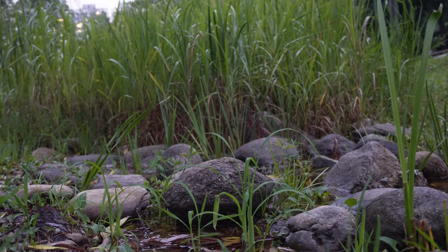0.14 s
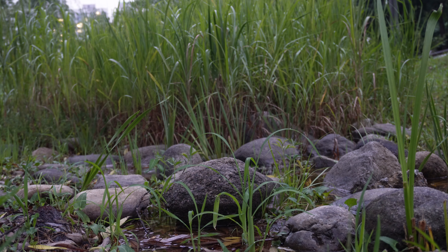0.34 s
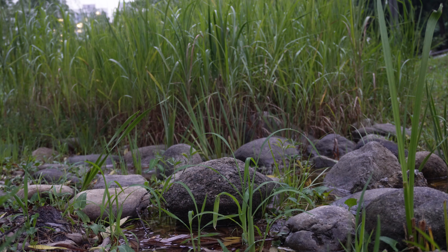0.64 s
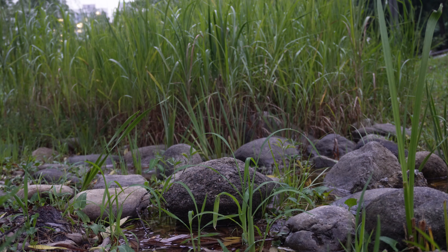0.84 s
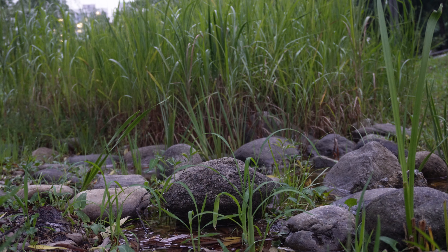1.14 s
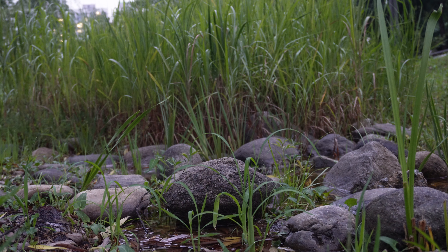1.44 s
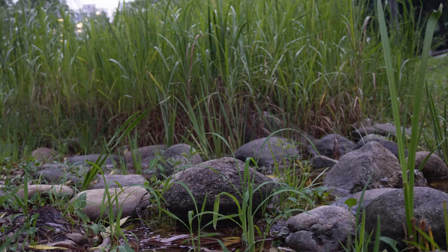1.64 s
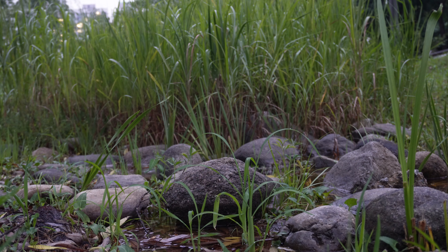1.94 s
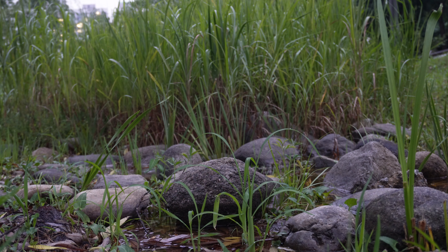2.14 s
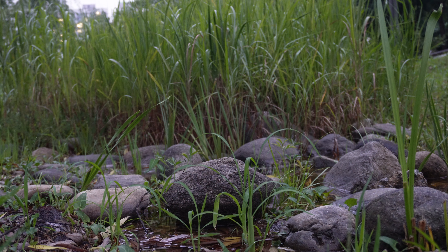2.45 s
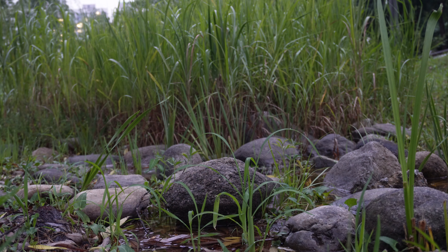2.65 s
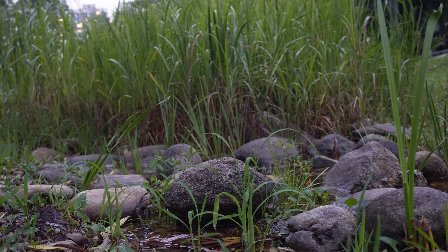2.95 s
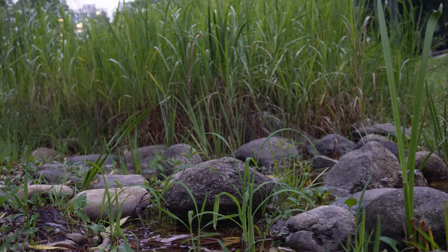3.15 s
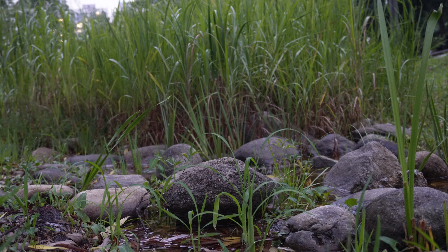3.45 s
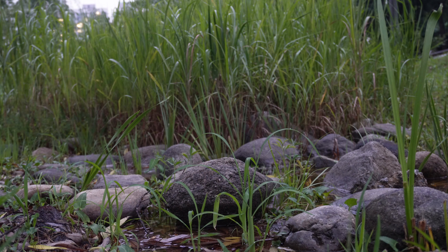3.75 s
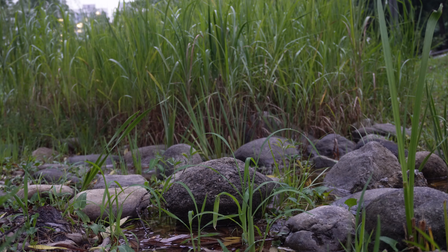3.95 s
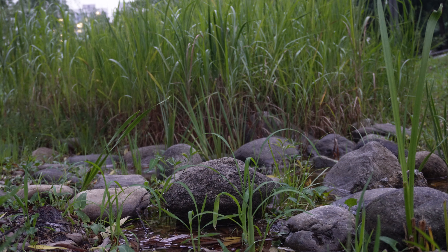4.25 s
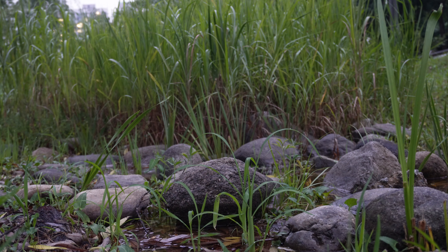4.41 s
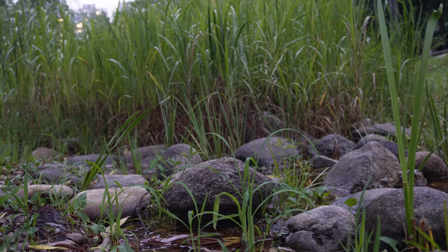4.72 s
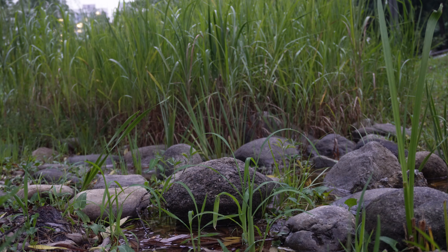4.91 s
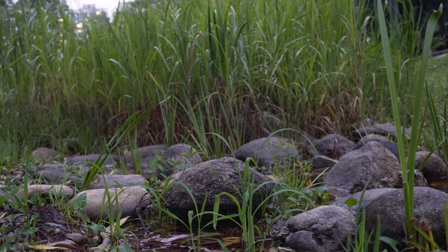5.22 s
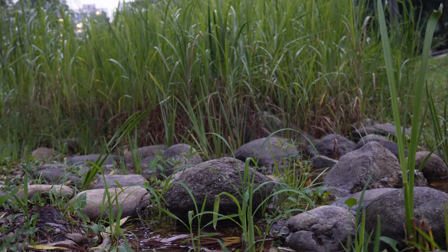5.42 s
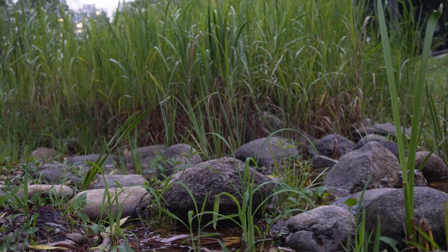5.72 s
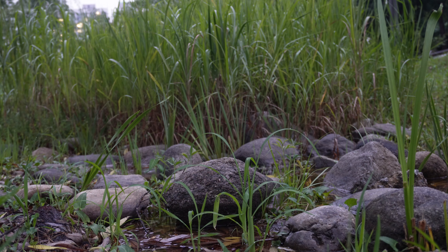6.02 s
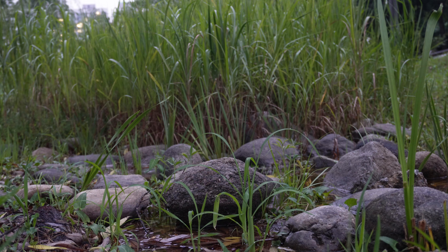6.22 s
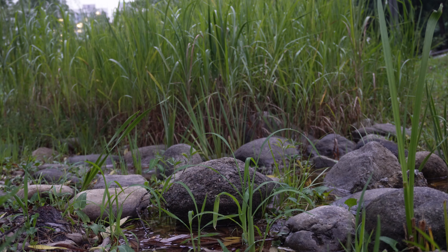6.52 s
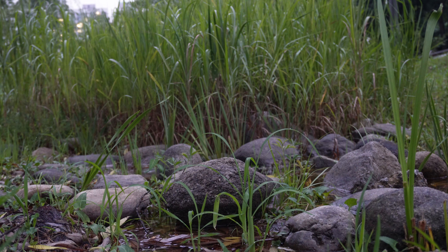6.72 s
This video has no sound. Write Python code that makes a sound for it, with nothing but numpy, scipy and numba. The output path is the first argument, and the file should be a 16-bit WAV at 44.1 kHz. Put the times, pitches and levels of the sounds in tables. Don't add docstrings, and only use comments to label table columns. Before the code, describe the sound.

A dense, bright cicada chorus shimmers without pause in a park with reeds and stones. One close cicada, near centre, repeats a phrase about once a second: a throbbing drone grows, drops into a loud steady ring, cuts off abruptly, then a thin very high zip follows. Two steady neighbours rattle, one at left. Low town rumble and a soft stream hush lie beneath. Stereo microphone outdoors, close to the singer.

```python
import sys
import numpy as np
from scipy import signal
from scipy.fft import rfft, irfft, next_fast_len
from scipy.io import wavfile
from scipy.ndimage import uniform_filter1d
from numba import njit

SR = 44100
rng = np.random.default_rng(int(sys.argv[2]) if len(sys.argv) > 2 else 0)


def rack_gain(trim_db):
    fader = np.asarray(trim_db, float)
    return 10 ** (fader / 20)


def file_out(sig):
    cols = np.atleast_2d(sig).T
    lim = np.clip(cols, -1, 1)
    pcm = np.round(lim * 32767).astype(np.int16)
    wavfile.write(sys.argv[1], SR, pcm)


N = 302967
T = np.arange(N) / SR
SIZE = next_fast_len(N + SR // 2)
HZ = np.maximum(np.arange(SIZE // 2 + 1) * SR / SIZE, 1)

# pitch_hz, level_db (per Hz)
TOWN_COLOUR = [(13, -40), (26, -11), (43, 0.5), (86, -3.5), (187, -1.5), (260, -5), (423, -11),
               (601, -12.5), (702, -15), (1190, -20), (1700, -22.5), (2300, -21.5), (3000, -35.5)]
# pitch_hz, side_minus_mid_db
TOWN_WIDTH = [(30, -48), (125, -36), (300, -22), (600, -17.5), (2000, -13)]
# nearest_s, swell_db, passing_s
VEHICLE_PASSES = [
    (-.1, 4.5, 0.69),
    (1.5, 3, 1.0),
    (2.75, 2, 0.22),
    (4.25, 2, 0.1),
    (6.95, 3.5, 0.28),
]
# centre_s, swell_db, length_s
ENGINE_REVS = [
    (0, 13, 0.55),
    (2.05, 12, 0.48),
    (6.9, 9, 0.67),
]
# pitch_hz, level_db (per Hz)
CROWD_COLOUR = [(1800, -53), (2350, -64), (2600, -23), (3150, -18.5), (3600, -8.5), (3940, -9),
                (4380, -3.5), (5250, -5), (5790, -4.5), (6770, -8), (9950, -18.5), (13400, -31.5),
                (15000, -45), (15800, -57)]
# pitch_hz, width_hz, level_db
CROWD_BUNCHES = [(4420, 730, 0), (5300, 99, -4.5), (5770, 280, 3.5)]
# pitch_hz, share (0-1)
CROWD_SHARED = [(2500, 0.84), (4000, 0.61), (6000, 0.31), (9000, 0.58), (12000, 0.4), (15000, 0.5)]
# pitch_hz, lead_radians
CROWD_LEAD = [(2500, 0.8), (4000, 0), (6000, 0.92), (9000, 1.57), (12000, 1), (15000, 7.5)]
# clicks_per_s, click_levels_db (one group), resonances (pitch_hz, width_hz, level_db),
# level_db, left_minus_right_db, right_lag_samples
STEADY_SINGERS = [
    (199.9, (-3.5, 4, -31, -30, -14, -1), [(3800, 990, -5.5), (4950, 100, -3.5), (5220, 500, -5), (6020, 470, -1.5), (6420, 45, -6.5)], -31, 6.3, 1.3),
    (226.5, (10, -14, 12, 1, -8, -16), [(4320, 540, -4), (6350, 390, -5), (9770, 4000, -8)], -29.5, 1, 1.53),
]
# ring_stop_s, ring_db, zip_db
SONG_PHRASES = [
    (-.52, 0, 0),
    (0.477, -3, 6),
    (1.501, -2.5, 5),
    (2.488, -2, 5),
    (3.532, -2.5, 5),
    (4.509, -2.5, 4),
    (5.493, -2, 4),
    (6.476, -1, 3),
    (7.47, -2, 0),
]
# left_minus_right_db, right_lag_samples, echo_db, echo_decay_s
ZIP_POSITION = (-1, 1.0, -3, .12)


def level(x, db):
    return x * rack_gain(db) / np.sqrt(np.mean(x ** 2))


def over_hz(table):
    hz, value = np.transpose(table)
    return np.interp(np.log(HZ), np.log(hz), value)


def ramp(t, start, length):
    return np.clip((t - start) / length, 0, 1)


def swells(rows):
    return sum(db * np.exp(-((T - s) / length) ** 2) for s, db, length in rows)


def walk(rate):
    k = int(SR / rate)
    held = np.repeat(rng.standard_normal(N // k + 1), k)
    return 1.3 * uniform_filter1d(uniform_filter1d(held, k), k)[:N]


@njit
def svf(x, hz, width):
    y, band, low = np.empty(len(x)), 0., 0.
    for i in range(len(x)):
        g, k = np.tan(np.pi * hz[i] / SR), width / hz[i]
        v = (band + g * (x[i] - low)) / (1 + g * (g + k))
        band, low, y[i] = 2 * v - band, low + 2 * g * v, k * v
    return y


def ring(x, hz, width):
    hz = hz + np.zeros(N)
    once = svf(x, hz, float(width))
    return level(svf(once, hz, float(width)), 0)


def tymbal(hz, group_db, drift, rough, scatter_db, wobble_hz=4):
    rate = hz * (1 + drift * walk(wobble_hz))
    turns = rng.random() * len(group_db) + np.cumsum(rate) / SR
    count = np.arange(int(turns[0]) + 1, int(turns[-1]))
    size = rack_gain(np.array(group_db)[count % len(group_db)] + scatter_db * rng.standard_normal(len(count)))
    moment = np.interp(count, turns, np.arange(N - 0.))
    first, clicks = moment.astype(int), np.zeros(N + 1)
    clicks[first] = size * (first + 1 - moment)
    clicks[first + 1] = size * (moment - first)
    clicks = clicks[:N]
    decay = np.exp(-1 / (0.0015 * SR))
    scrape = signal.lfilter([1], [1, -decay], clicks) * rng.standard_normal(N)
    rough = np.clip(rough, 0, 1)
    return np.sqrt(1 - rough) * level(clicks, 0) + np.sqrt(rough) * level(scrape, 0)


def place(x, pan_db, lag, wet_db, t60):
    age = np.arange(SR // 3) / SR
    echoes = rng.standard_normal((2, len(age))) * rack_gain(-60 * age / t60) * (age > .004)
    echoes *= rack_gain(wet_db) / np.sqrt(np.sum(echoes ** 2, axis=1, keepdims=True))
    delay = np.exp(-1j * np.pi * HZ / SR * lag * np.array([[-1], [1]]))
    direct = delay * rack_gain(np.array([[pan_db], [-pan_db]]) / 2)
    return irfft(rfft(x, SIZE) * (direct + rfft(echoes, SIZE)), SIZE)[:, :N]


def town():
    mid, side = rfft(rng.standard_normal((2, SIZE))) * rack_gain(over_hz(TOWN_COLOUR))
    both = mid + side * rack_gain(over_hz(TOWN_WIDTH)) * np.array([[1], [-1]])
    water = HZ ** 2 / (HZ ** 2 + 514.0 ** 2)
    rumble = irfft(both * (1 - water), SIZE)[:, :N]
    stream = irfft(both * water, SIZE)[:, :N]
    rumble_db = -41 + swells(VEHICLE_PASSES)
    return level(rumble, 0) * rack_gain(rumble_db) + level(stream, -48.5) * rack_gain(.6 * walk(4.0))


def motor():
    fast_hz, idle_hz = 221.3, 180.7
    hz = fast_hz + (idle_hz - fast_hz) * ramp(T, start=0.73, length=1.82)
    return rack_gain(-52.5 + swells(ENGINE_REVS)) * ring(rng.standard_normal(N), hz, 12.3)


def crowd(count=18):
    out, alike = 0, np.clip(over_hz(CROWD_SHARED), 0, 1)
    lead = over_hz(CROWD_LEAD)
    age = np.arange(SR // 4) / SR
    for _ in range(count):
        rate, side = rng.random(2)
        group_db = 5.1 * rng.standard_normal(6)
        clicks = tymbal(180 + 60 * rate, group_db, drift=.01, rough=0.56, scatter_db=0.86)
        tails = rfft(rng.standard_normal((3, len(age))) * rack_gain(-60 * age / 0.16), SIZE)
        turn = lead + 2 * np.pi * HZ / SR * 0.82 * (side - .5)
        lag = np.exp(-.5j * turn * np.array([[-1], [1]]))
        paths = np.sqrt(alike) * tails[0] * lag + np.sqrt(1 - alike) * tails[1:]
        out = out + rfft(clicks * rack_gain(0.37 * walk(1.44)), SIZE) * paths
    bunches_db = sum(g * np.exp(-((HZ - f) / w) ** 2 * 2) for f, w, g in CROWD_BUNCHES)
    colour_db = over_hz(CROWD_COLOUR) + bunches_db
    sound = level(irfft(out * rack_gain(colour_db), SIZE)[:, :N], 0) * rack_gain(np.array([[.4], [-.4]]))
    return sound * rack_gain(-17.5 - 0.1737 * T)


def neighbours():
    out = 0
    for hz, group_db, modes, db, pan_db, lag in STEADY_SINGERS:
        clicks = tymbal(hz, group_db, drift=.003, rough=0.47, scatter_db=1.0)
        voice = sum(rack_gain(g + 0.38 * walk(1.35)) * ring(clicks, f, w) for f, w, g in modes)
        out = out + place(level(voice, db), pan_db, lag, wet_db=-12.5, t60=0.49)
    return out


def phrase(stop):
    lower_at_s, lower_s = -.185, .085
    restart_s, attack_s, stop_s = .17, .04, .016
    zip_at_s, zip_attack_s, zip_hold_s, zip_release_s = 0.084, .07, 0.043, .035
    k = np.clip(np.searchsorted(stop, T), 1, len(stop) - 1)
    since, until = T - stop[k - 1], T - stop[k]

    sinking = ramp(until, lower_at_s, lower_s)
    low = np.maximum(sinking, 1 - ramp(since, .0, .2))
    zip_rise = ramp(since, zip_at_s - zip_attack_s, zip_attack_s)
    zip_ = zip_rise * (1 - ramp(since, zip_at_s + zip_hold_s, zip_release_s))

    singing = ramp(since, restart_s, attack_s) * (1 - ramp(until, -stop_s, stop_s))
    song_db = -3 + 2.5 * (since - restart_s) + 1 * np.sin(np.pi * sinking)
    murmur, rest = zip_ ** 2 * rack_gain(-25), rack_gain(-36)
    effort = singing * rack_gain(song_db) + murmur + rest

    upper_hz = 3390 + 2900 * np.minimum(-until, -lower_at_s)
    sag_hz = 120 * np.maximum(until - lower_at_s - lower_s, 0)
    belly_hz = 1469.7 - 78.07 * low - sag_hz
    return belly_hz, upper_hz, effort, low, zip_


def soloist():
    stop, ring_db, zip_db = np.transpose(SONG_PHRASES)
    belly_hz, upper_hz, push, low, zip_ = phrase(stop)
    click_hz = belly_hz / 7.5
    clicks = tymbal(click_hz, (0, -9), drift=.009 - .0065 * low, rough=.36 - .2 * low,
                    scatter_db=1.2, wobble_hz=45)
    one_side = tymbal(click_hz / 2, (0,), drift=.025 - .02 * low, rough=.2 - .1 * low,
                      scatter_db=1.0, wobble_hz=40)
    throb_hz = 26.57 * (1 + 0.031 * walk(2.97))
    throb = 1 + 0.34 * (1 - low) * np.sin(2 * np.pi * np.cumsum(throb_hz) / SR)
    effort = throb * push
    swell = rack_gain(low * np.interp(T, stop, ring_db))
    no_lows = signal.butter(6, 2480, "high", fs=SR, output="sos")
    drive = signal.sosfilt(no_lows, clicks * effort * swell)

    body = rack_gain(-54.5) * ring(one_side * effort ** 0.17, belly_hz * (1.02 - 0.0096 * low), 144)
    body += rack_gain(-39 + 7 * low ** 3) * ring(drive, 2 * belly_hz, 185)
    body += rack_gain(-51 + 14.5 * low ** 2) * ring(drive, 2640, 200)
    body += rack_gain(-40.5) * low ** 2 * ring(drive, 3106, 190)
    body += rack_gain(-30) * low ** 2 * ring(drive, upper_hz, 260)
    body += rack_gain(-34.0) * (1 - low) ** 2 * ring(drive, 4.94 * belly_hz, 480)

    rasp = tymbal(188, (0, -2), drift=.01, rough=.7, scatter_db=1.0)
    thin = rack_gain(-46) * ring(rasp, 12400, 3500) + rack_gain(-53) * ring(rasp, 14400, 2200)
    zips = rack_gain(np.interp(T, stop + .1, zip_db)) * zip_ * thin
    return place(body, pan_db=1.5, lag=.9, wet_db=-5, t60=0.044) + place(zips, *ZIP_POSITION)


def scene():
    return town() + motor() + crowd() + neighbours() + soloist()


def band_limit(x):
    return signal.sosfilt(signal.butter(12, 15780, fs=SR, output="sos"), x)


def record(dry):
    return band_limit(dry)


dry = scene()
out = record(dry)
file_out(out)
```